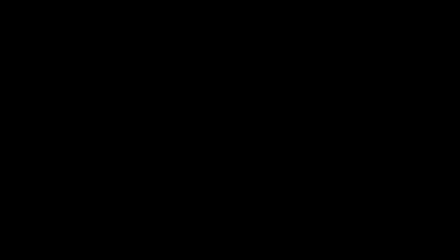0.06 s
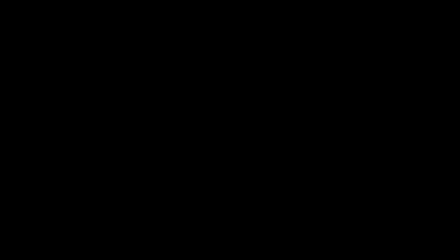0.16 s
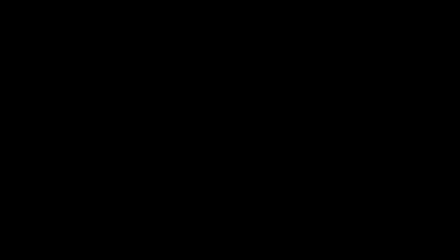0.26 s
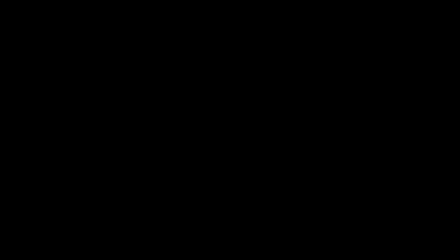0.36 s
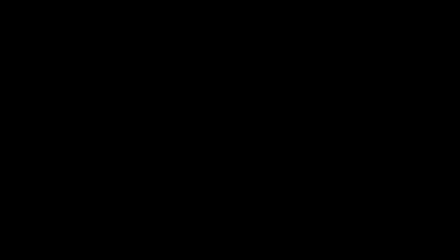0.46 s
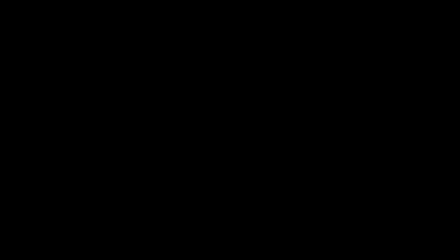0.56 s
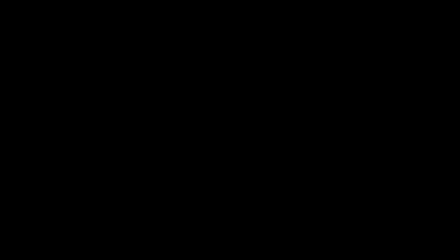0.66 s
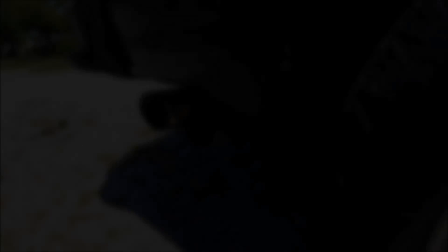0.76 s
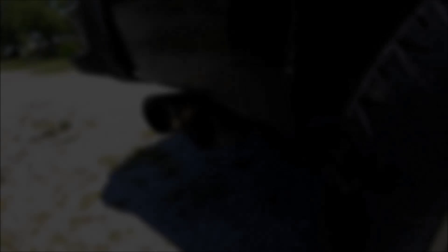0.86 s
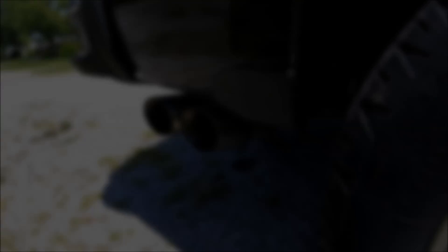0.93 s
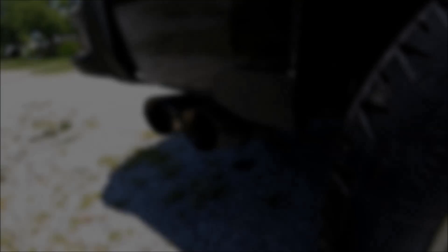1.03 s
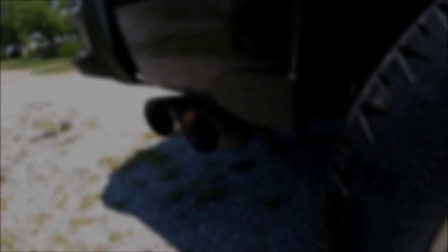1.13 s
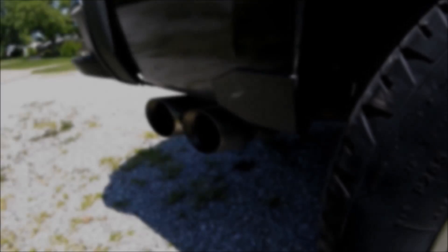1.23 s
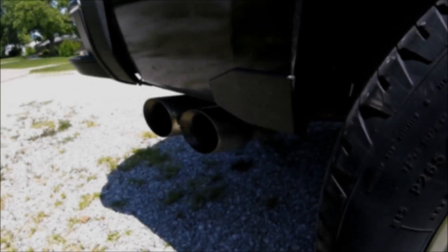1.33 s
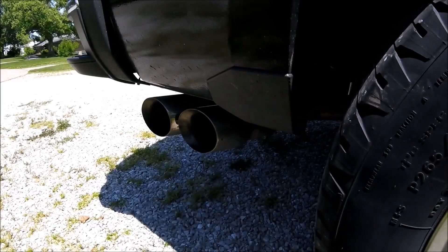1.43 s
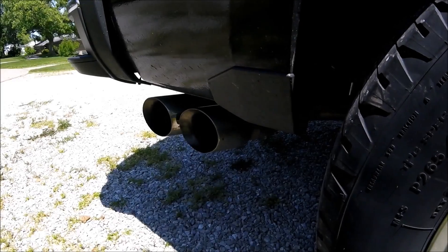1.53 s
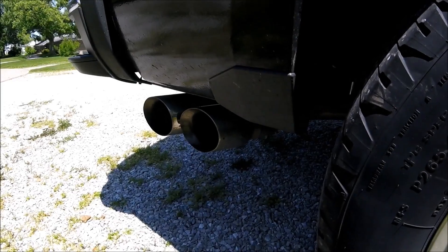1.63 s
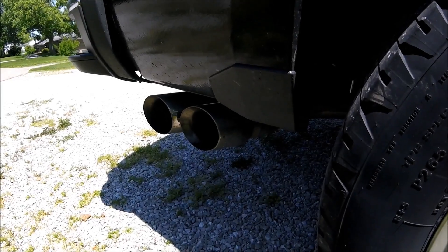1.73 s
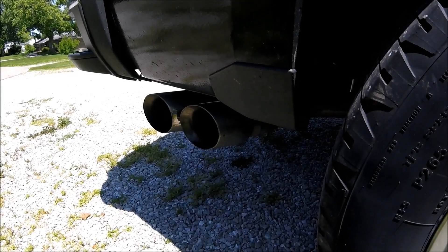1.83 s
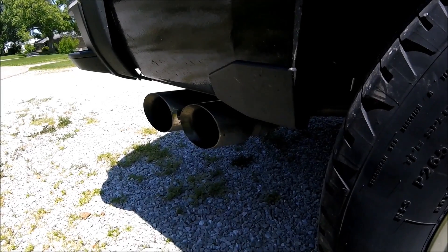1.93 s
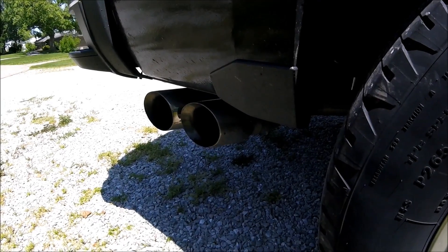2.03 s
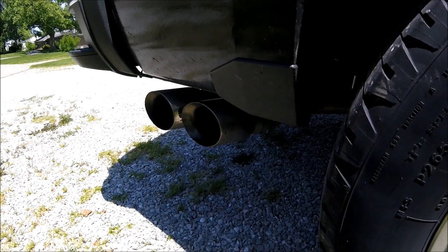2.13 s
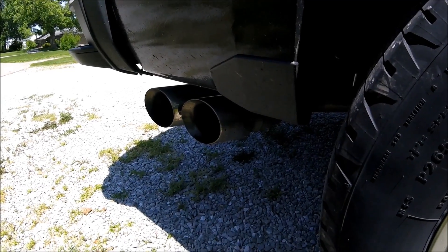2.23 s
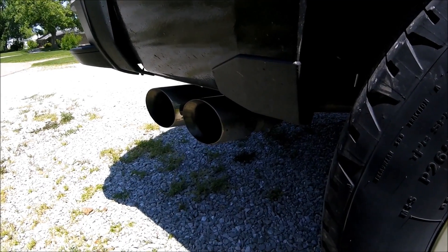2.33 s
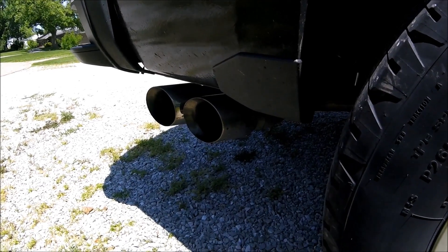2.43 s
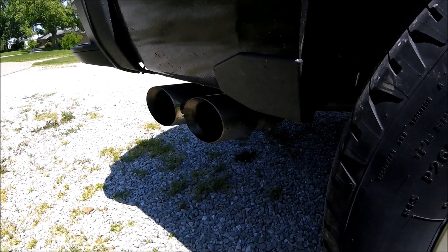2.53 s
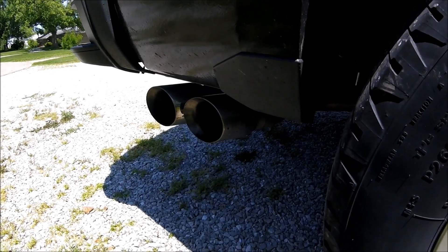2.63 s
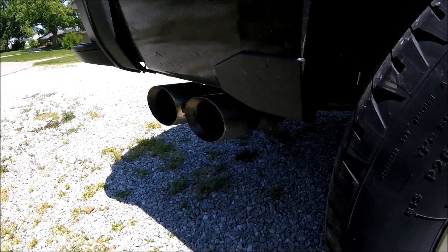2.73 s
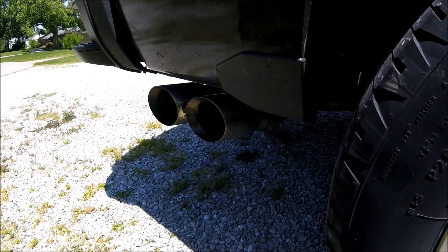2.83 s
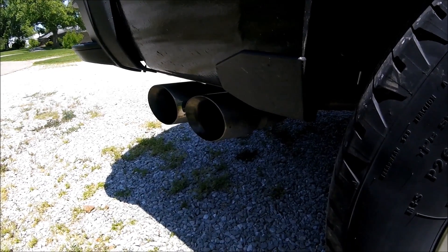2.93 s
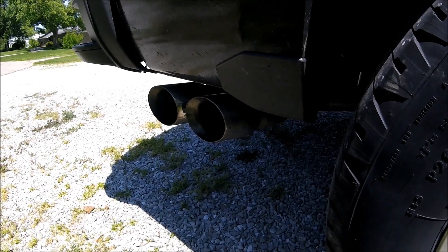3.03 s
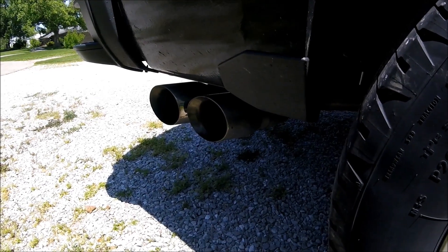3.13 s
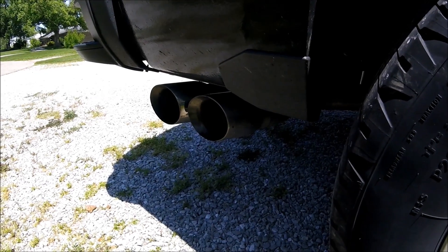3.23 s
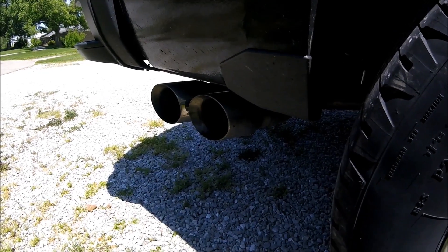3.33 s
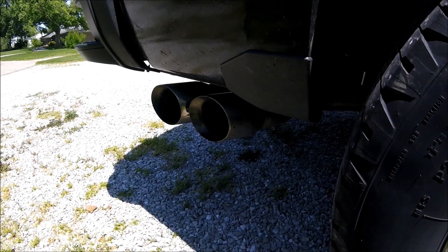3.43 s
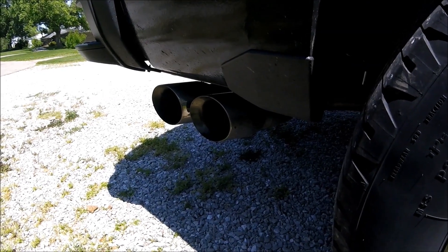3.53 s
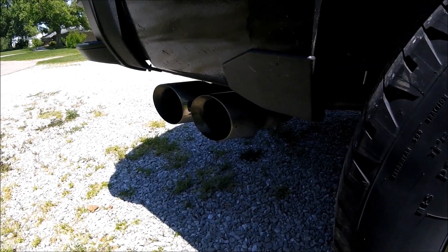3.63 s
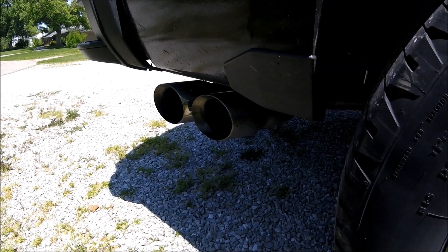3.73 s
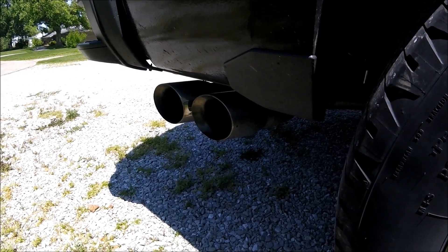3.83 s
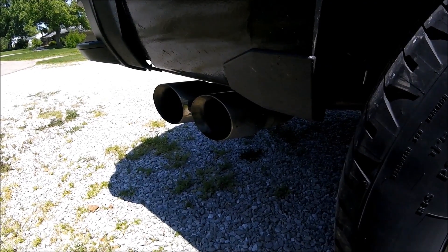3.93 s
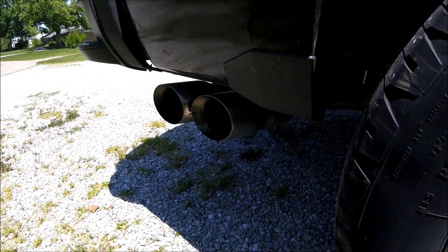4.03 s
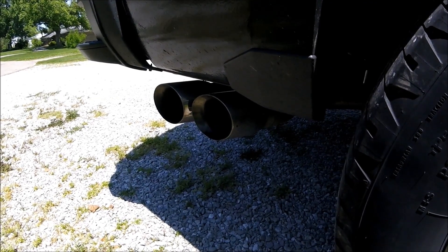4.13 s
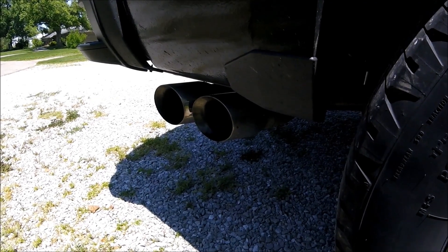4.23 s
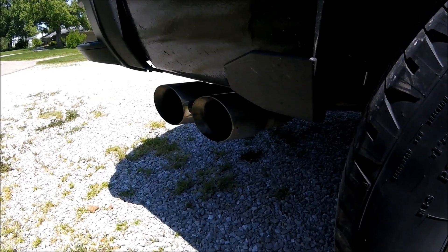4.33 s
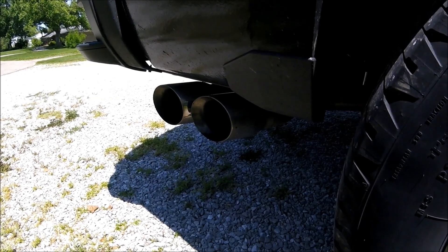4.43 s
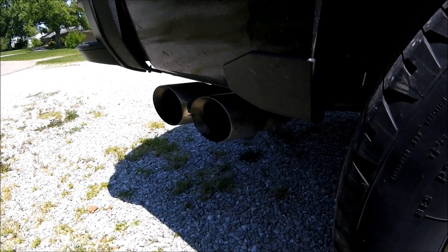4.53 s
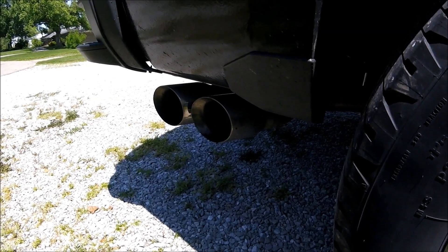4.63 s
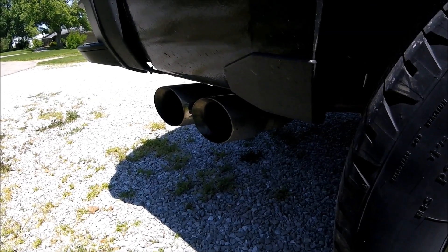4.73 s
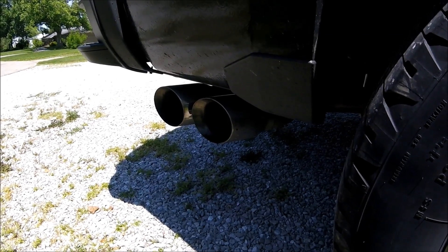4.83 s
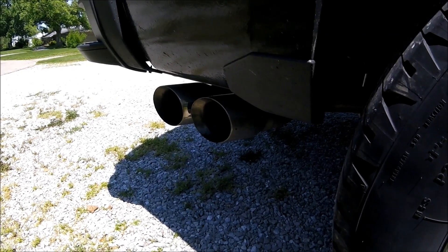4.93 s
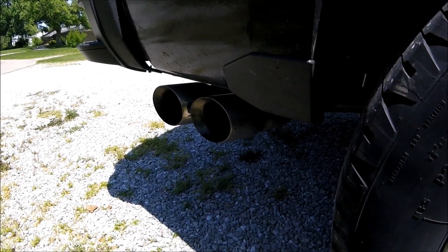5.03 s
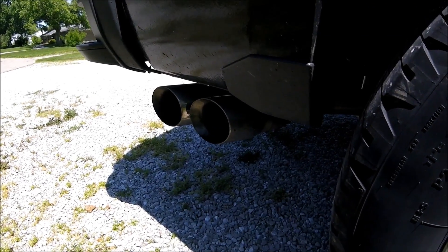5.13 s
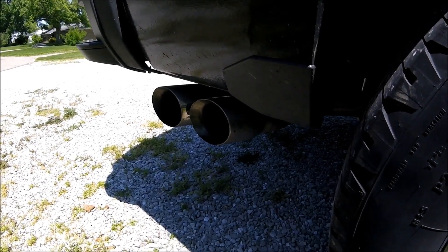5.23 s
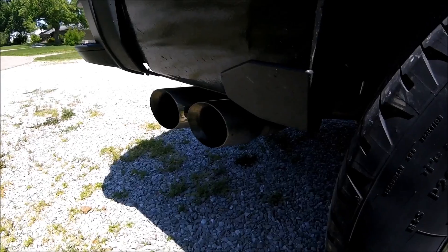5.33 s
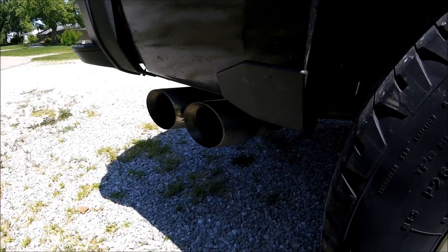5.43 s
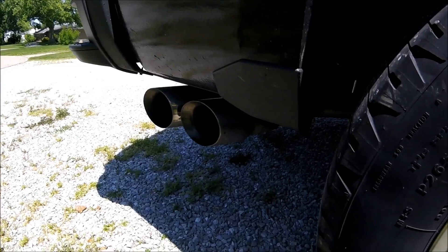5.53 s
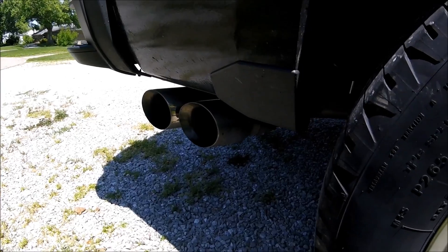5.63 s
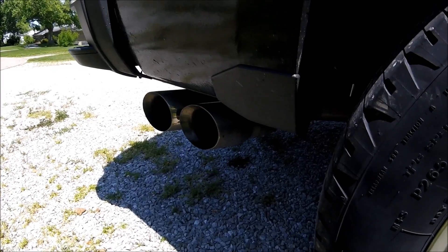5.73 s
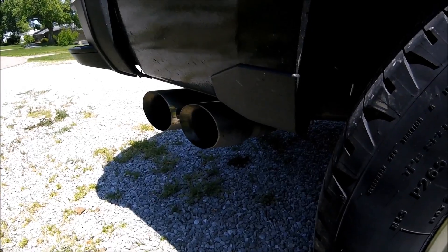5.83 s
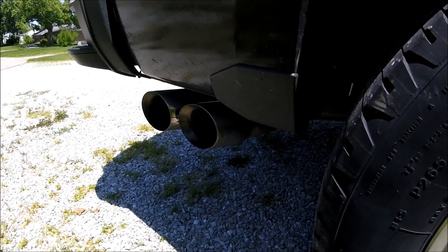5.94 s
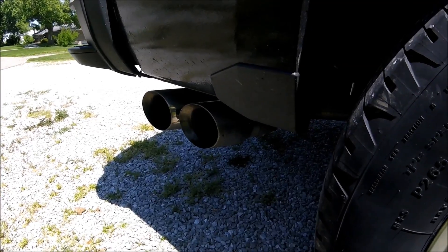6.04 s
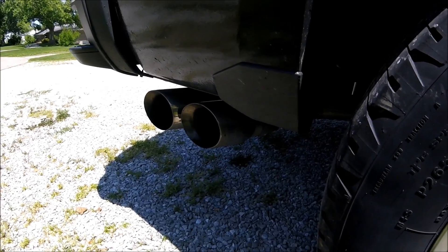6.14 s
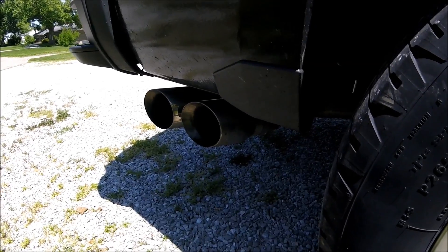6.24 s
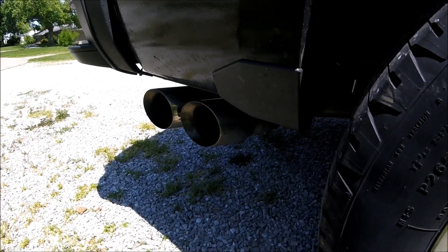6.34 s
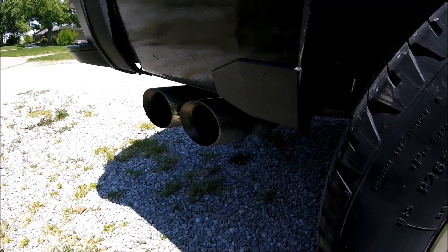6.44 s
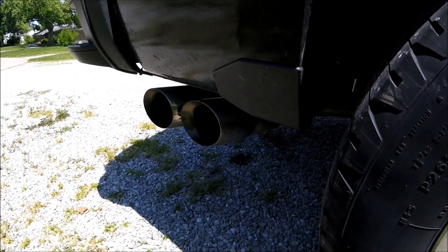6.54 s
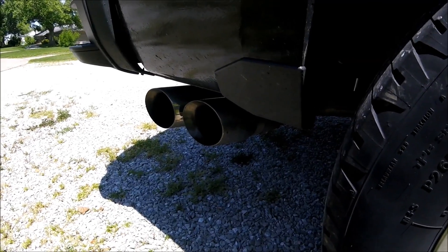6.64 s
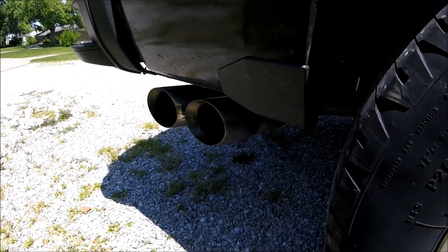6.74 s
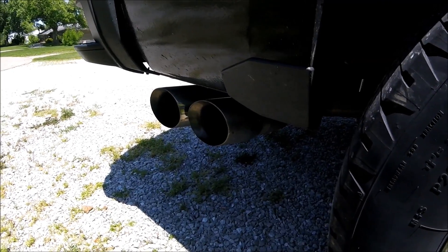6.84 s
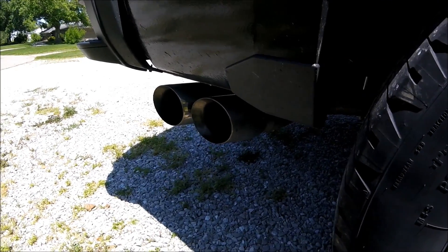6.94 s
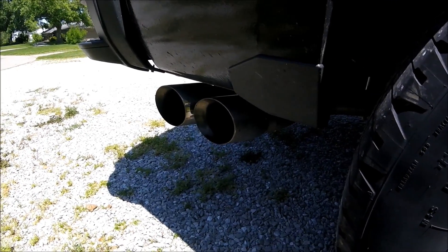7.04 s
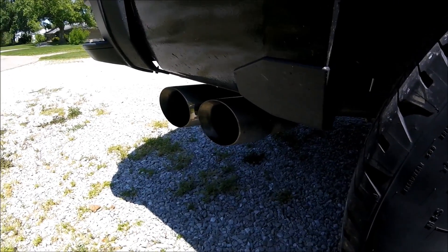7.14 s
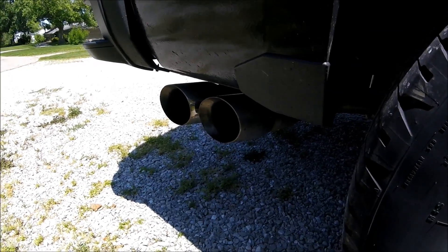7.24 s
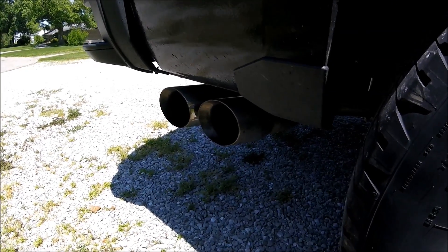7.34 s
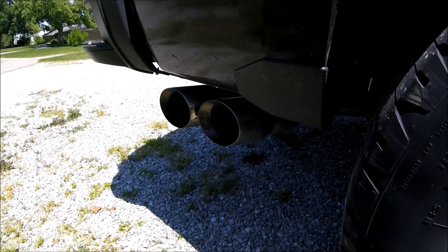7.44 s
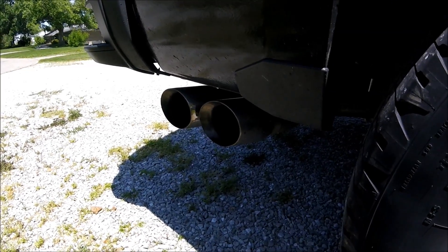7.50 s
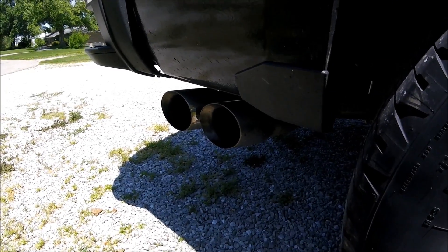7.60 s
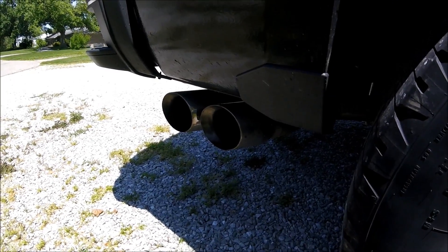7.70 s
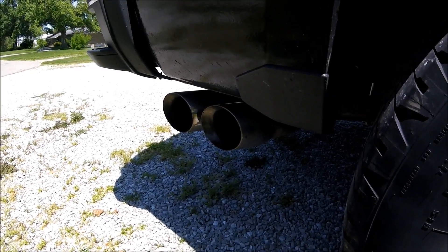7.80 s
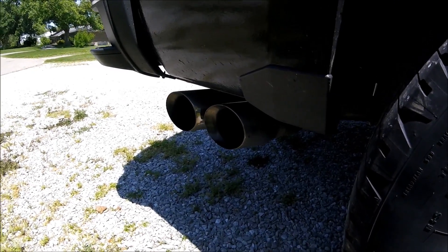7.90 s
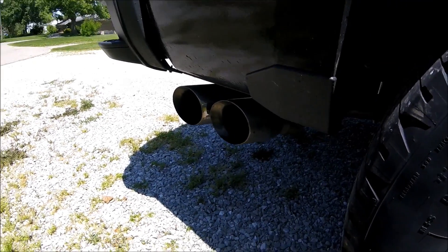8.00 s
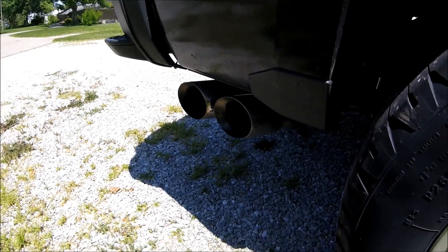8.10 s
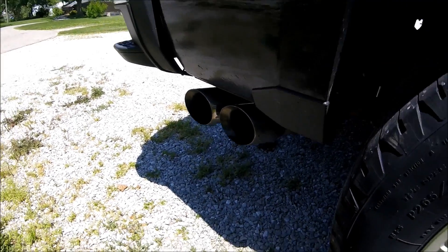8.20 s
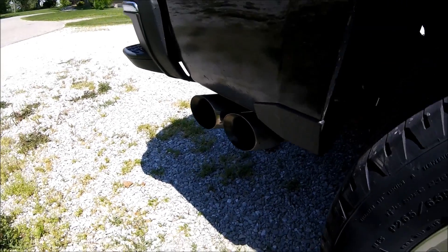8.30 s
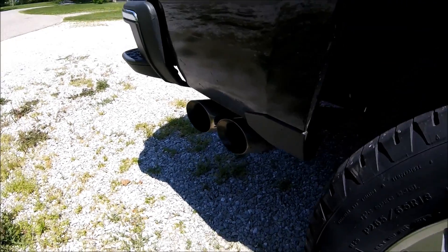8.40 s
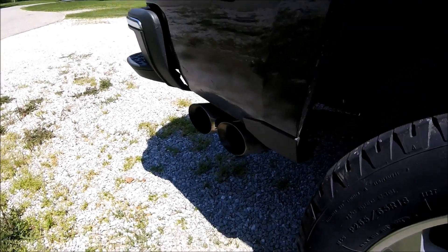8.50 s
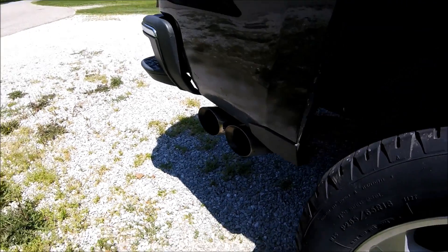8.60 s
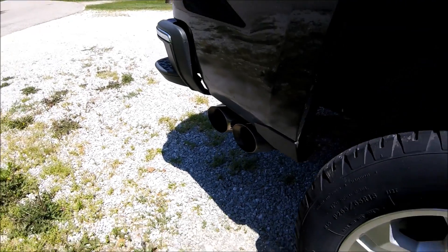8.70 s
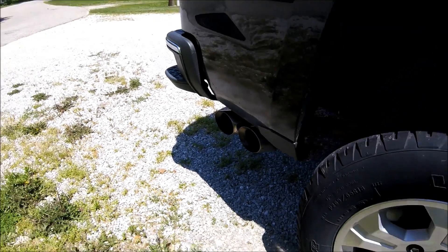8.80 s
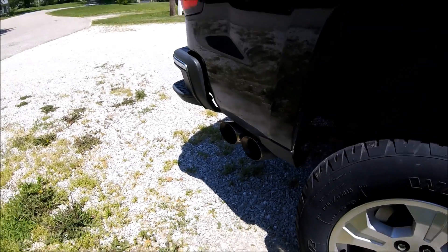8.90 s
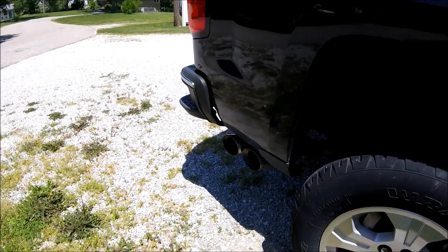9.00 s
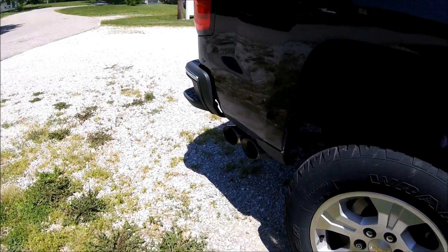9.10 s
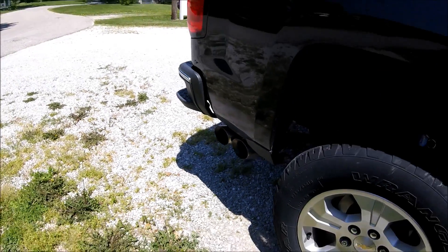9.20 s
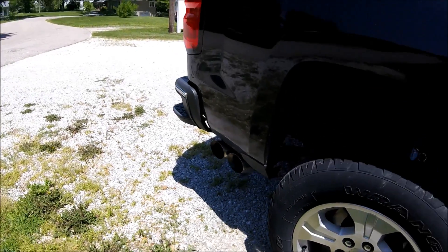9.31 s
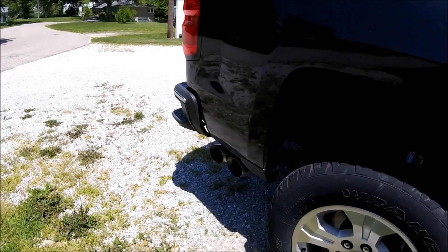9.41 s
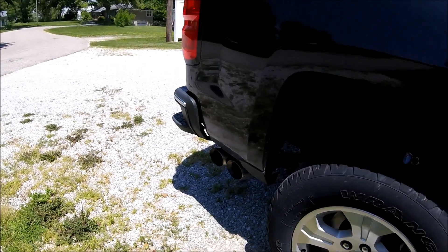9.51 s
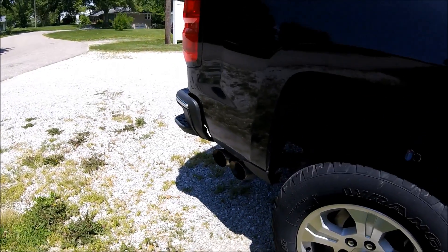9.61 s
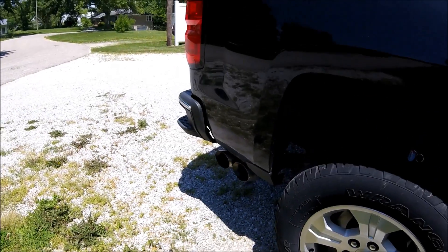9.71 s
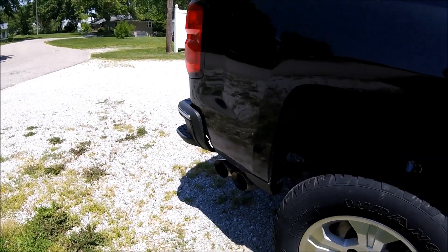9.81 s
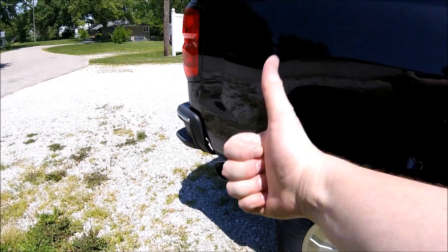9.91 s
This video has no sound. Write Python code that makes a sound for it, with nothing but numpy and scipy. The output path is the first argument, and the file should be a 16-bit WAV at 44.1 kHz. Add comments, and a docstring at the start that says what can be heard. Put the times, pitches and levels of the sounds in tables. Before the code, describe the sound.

The first 1.4 seconds are quiet: faint insects and distant traffic fade in outdoors, with soft bird chirps around 0.4 seconds and clearer sliding notes from 1.0 to 1.3. At 1.44 a starter clashes in, grinding and heaving over compressions with a high wavering whine and ringing metal until about 2.1. Uneven firings thump and crack, and at 2.3 the V8 lights with a loud burst of exhaust and sharp pops, revving up until about 2.6. It eases through 3 to 4 seconds into a deep, booming fast idle, slowing slightly, with throaty growl, hissing gas puffs and a loping pulse. Tiny dry ticks and faint metallic clinks are nearly buried around 6.0 to 6.2, with another tick near 7.2. From about 8.1 the close microphone lifts from the tailpipes; boom and growl thin while the idle continues to the end, near 10.

```python
"""A gravel drive, close to the tailpipes of a V8 truck: insects and far traffic fade in, and birds sing.
The starter clashes in and cranks; a few lone firings catch, the engine flares, then settles to a fast idle.
Near the end the microphone is lifted away from the pipes. Each firing rings pipe resonances and blows a
noisy puff of gas; the starter is coloured noise and unsteady tones; birds are gliding sines with an echo."""
import sys
import numpy as np
from scipy import signal
from scipy.fft import rfft, irfft, next_fast_len
from scipy.io import wavfile
from scipy.ndimage import uniform_filter1d

SR = 44100
rng = np.random.default_rng(int(sys.argv[2]) if len(sys.argv) > 2 else 0)


def waveform_to_disk(signal):
    """Save audio, clipped to [-1, 1], as 16-bit WAV at the path in sys.argv[1]."""
    frames = np.transpose(np.atleast_2d(signal))
    scaled = np.clip(frames, -1, 1) * 32767
    samples = np.round(scaled).astype(np.int16)
    wavfile.write(sys.argv[1], SR, samples)


N = 439236  # length in samples
TIME = np.arange(N) / SR  # seconds


def amp(db):
    """Gain of a level in dB."""
    return 10 ** (np.asarray(db) / 20)


def ramp(x, start, end):
    """0 up to start, 1 from end on, a straight line between."""
    return np.clip((x - start) / (end - start), 0, 1)


def steady(x, seconds):
    """x with its rms over a sliding span brought to about 1."""
    size = int(seconds * SR)
    power = uniform_filter1d(uniform_filter1d(x * x, size=size), size=size)
    return x / np.sqrt(np.abs(power) + 1e-12)


def curves(rows, outside=None):
    """One value per sample for each column after the time, joined by straight lines."""
    s, *columns = np.transpose(rows)
    return [np.interp(TIME, s, column, outside, outside) for column in columns]


def filtered(x, response):
    """x with its spectrum multiplied by a response, a function of frequency in Hz."""
    size = next_fast_len(N + SR // 2)
    return irfft(rfft(x, size) * response(np.fft.rfftfreq(size, 1 / SR)), size)[:N]


def colour(points):
    """Gain drawn through (Hz, dB) points on a log frequency axis, nearly silent beyond the ends."""
    f, db = np.transpose(points)
    return lambda hz: amp(np.interp(np.log(hz + 1), np.log(f), db, -120, -120))


def noise(points):
    """Coloured noise of rms 1."""
    x = filtered(rng.standard_normal(N), colour(points))
    return x / x.std()


def pulses(times, sizes):
    """Single-sample pushes."""
    at = np.clip(np.round(times * SR).astype(int), 0, N - 1)
    return np.bincount(at, sizes, N)


def puffs(pushes, rise_ms, fall_ms):
    """Envelope that swells and dies after every push."""
    t_ms = np.arange(SR // 10) * 1000 / SR
    shape = (1 - np.exp(-t_ms / rise_ms)) * np.exp(-t_ms / fall_ms)
    return signal.fftconvolve(pushes, shape / shape.max())[:N]


def whistle(rows, wander):
    """A sine that follows (s, Hz, rms dB) rows; its phase drifts by about wander radians."""
    hz = curves(rows)[0]
    level = amp(curves(rows, outside=-200)[1])
    drift = wander * steady(uniform_filter1d(rng.standard_normal(N), size=200), 0.78)
    sine = np.sin(2 * np.pi * np.cumsum(hz) / SR + drift)
    return np.sqrt(2) * uniform_filter1d(level, size=150) * sine


# Tone colour of the far traffic and insects. Each row: frequency in Hz, relative level in dB per Hz.
AIR = [(12, -26.5), (20, -2.5), (92, -6), (281, -23.5), (655, -27.5), (2000, -37), (2630, -34.5),
       (3750, -44), (5800, -46), (6650, -33), (13500, -58.5)]
AIR_DB, FADE_S = -50.5, 1.5  # level before the engine catches; seconds to fade in
AIR_LIT_DB = -9  # traffic and insects sound this much quieter once the engine has lit


def far_air():
    """Far traffic and insects as one coloured noise."""
    lit = ramp(TIME, CATCH[0][0], SPEED[1][0])
    return amp(AIR_DB + AIR_LIT_DB * lit) * ramp(TIME, 0, FADE_S) * noise(AIR)


# Bird notes. Each row: start in seconds, length in seconds, from Hz, to Hz, level in dB after the slur.
BIRDS = [(0.38, 0.08, 2900, 3010, -79), (0.475, 0.13, 2200, 2320, -78), (0.55, 0.027, 2800, 3200, -69.5),
         (0.567, 0.11, 3150, 2580, -74.5), (1.003, 0.027, 2290, 2240, -71), (1.024, 0.052, 2280, 2620, -59),
         (1.082, 0.026, 2580, 2180, -63), (1.112, 0.05, 2500, 2560, -67), (1.152, 0.035, 2540, 2160, -62),
         (1.209, 0.044, 2590, 2560, -62.5), (1.258, 0.073, 2610, 3000, -61)]
SLUR_S = 0.016  # longest glide between the two pitches, in seconds
START_DB, END_DB = 1, 2  # each note's start and end, relative to its level after the slur


def birds():
    """Each note slurs quickly to its second pitch; decaying noise makes a short echo."""
    song = 0
    for s, length, from_hz, to_hz, db in BIRDS:
        slurred_s = s + min(SLUR_S, length / 2)
        note = [(s, from_hz, db + START_DB), (slurred_s, to_hz, db), (s + length, to_hz, db + END_DB)]
        song = song + whistle(note, wander=0.69)
    tail_s = np.arange(SR // 4) / SR
    tail = rng.standard_normal(len(tail_s)) * amp(-60 * tail_s / 0.35)  # falls 60 dB per 0.35 s
    return song + amp(-6) * signal.fftconvolve(song, tail / np.linalg.norm(tail))[:N]


# Small dry ticks. Each row: time in seconds, peak level in dB.
TICKS = [(6.026, -54), (6.087, -50), (7.1735, -45)]


def dry_ticks():
    """Very short puffs of bright noise."""
    s, db = np.transpose(TICKS)
    bright = noise([(3500, -2), (7000, 7), (11000, -21.0)])
    return puffs(pulses(s, amp(db)), rise_ms=0.22, fall_ms=8.0) * bright


# A small metal thing clinks. Each row: time in seconds, starting level in dB.
CLINKS = [(6.0, -62), (6.18, -64)]
CLINK_HZ, CLINK_T60_S = 9640, 0.3  # pitch; seconds to fall by 60 dB


def metal_clinks():
    """A high sine that dies away at an even rate in dB."""
    return sum(whistle([(s, CLINK_HZ, db), (s + CLINK_T60_S, CLINK_HZ, db - 60)], wander=.3)
               for s, db in CLINKS)


def outdoors():
    """All the surroundings together."""
    return far_air() + birds() + dry_ticks() + metal_clinks()


# The starter clashes in, then heaves over each compression.
# Each row: time in seconds, added rumble in dB, grind in dB.
HEAVES = [(1.436, -66, -37), (1.46, -31.5, -34), (1.69, -62, -41), (1.834, -36, -39), (1.962, -36.5, -33.5),
          (2.071, -45, -39.5)]
# Tone colours of the body rumble, the gear grind and the gear noise between heaves.
# Each row: frequency in Hz, relative level in dB per Hz.
RUMBLE = [(12, -27), (20, 4.5), (43, -7), (92, -6.5), (124, 3.5), (162, -13), (260, -16.5), (340, -49)]
GRIND = [(150, -36), (285, 6), (363, -2.5), (580, 5.5), (682, -8), (1510, -8), (1890, -5.5), (2980, -19),
         (6380, -12), (7380, -23), (12000, -45), (14000, -70)]
MESH = [(110, -4), (200, -4.5), (900, -3), (2500, -12.5), (3800, -23), (4600, -17.5), (6500, -14.5),
        (9000, -33)]
ENGAGE_S, RELEASE_S = 1.44, 2.115
CRANK_RUMBLE_DB, CRANK_GRIND_DB = -46.5, -44.5  # levels between heaves


def cranking():
    """Rumble and grind noise swell at each heave, over a constant gear noise."""
    s, rumble_db, grind_db = np.transpose(HEAVES)
    rumble = amp(CRANK_RUMBLE_DB) + puffs(pulses(s, amp(rumble_db)), rise_ms=14, fall_ms=78)
    grind = puffs(pulses(s, amp(grind_db)), rise_ms=2.2, fall_ms=30.0)
    engaged = ramp(TIME, ENGAGE_S - 0.012, ENGAGE_S) * ramp(TIME, RELEASE_S, RELEASE_S - 0.0075)
    return engaged * (rumble * noise(RUMBLE) + grind * noise(GRIND) + amp(CRANK_GRIND_DB) * noise(MESH))


# The whine droops under load. Each row: start in seconds, end in seconds, from Hz, to Hz, level in dB.
DROOPS = [(1.83, 1.885, 6300, 5600, -54), (1.965, 2.04, 6500, 5750, -55)]
WHINE_S, WHINE_HZ, WHINE_DB = (1.515, 1.75), (4200, 5430), -57.5  # start and end; lowest and highest pitch


def pinion_whine():
    """The pinion teeth sing as they speed up and slow down again, then droop under load."""
    turn = np.linspace(0, 1, num=21)
    s = np.interp(turn, (0, 1), WHINE_S)
    hz = np.interp(np.sin(np.pi * turn) ** 2, (0, 1), WHINE_HZ)
    arch = np.transpose([s, hz, WHINE_DB + 0 * turn])
    droops = sum(whistle([(start, from_hz, db), (end, to_hz, db)], wander=.9)
                 for start, end, from_hz, to_hz, db in DROOPS)
    return whistle(arch, wander=1) + droops


# Ringing tones of the starter housing.
# Each row: start in seconds, peak in seconds, end in seconds, frequency in Hz, peak level in dB.
HOUSING_RINGS = [(1.59, 1.71, 1.77, 1855, -48), (1.96, 2.01, 2.09, 1855, -48), (1.69, 1.72, 1.79, 860, -45),
                 (1.835, 1.85, 1.9, 1200, -46), (1.97, 2.01, 2.04, 1200, -46), (1.83, 1.86, 1.91, 550, -42),
                 (1.68, 1.71, 1.75, 460, -46), (1.62, 1.65, 1.68, 1000, -49)]


def housing_rings():
    """Each tone swells to its peak and fades a little before it stops."""
    return sum(whistle([(start, hz, db - 7.5), (peak, hz, db), (end, hz, db - 7)], wander=.6)
               for start, peak, end, hz, db in HOUSING_RINGS)


def starter():
    """The clash and cranking, the pinion whine and the ringing housing."""
    return cranking() + pinion_whine() + housing_rings()


# Pipe and muffler resonances: boom, bark, growl, rasp, then SING near 280 Hz and SNAP, the firing's clean edge.
# Each row: frequency in Hz, width in Hz, relative level in dB.
BOOM = [(55.1, 14.0, -4.1), (79.1, 33.8, 0.0), (113.4, 14.0, -4.2)]
BARK = [(159.2, 17.1, 0.0), (197.1, 19.3, -2.1)]
GROWL = [(348.9, 14.8, -18.0), (389.0, 59.5, -6.6), (419.0, 16.0, 0.0), (472.9, 14.0, -3.6)]
RASP = [(494.4, 44.3, 0.0), (574.2, 14.8, -5.8), (604.4, 25.3, -9.8), (651.3, 60.0, -15.9)]
SING = [(278, 50, 0)]
SNAP = [(827, 40, 0), (1080, 150, -8), (1800, 110, -12), (2400, 120, -8)]
# The band of the gas pulse for each of the six sets above, in that order.
# Each row: low edge in Hz, high edge in Hz, steepness of the edges, muffler delay in ms.
PULSE_BANDS = [(15, 140, 10, 1), (130, 250, 10, 1.7), (300, 490, 30, 0), (490, 740, 30, 0),
               (235, 325, 30, 0), (740, 2700, 30, 2)]
PIPE_MODES = {"boom": BOOM, "bark": BARK, "growl": GROWL, "rasp": RASP, "sing": SING, "snap": SNAP}


def pipe(name):
    """Resonances whose signs alternate, fed by a soft gas pulse that spans only their band."""
    low_hz, high_hz, steep, delay_ms = PULSE_BANDS[list(PIPE_MODES).index(name)]

    def response(f):
        delay = np.exp(-2j * np.pi * f * delay_ms / 1000)
        band = delay / (1 + (f / high_hz) ** steep) / (1 + (low_hz / (f + 1)) ** steep)
        ringing = 0
        for k, (centre, width, db) in enumerate(PIPE_MODES[name]):
            ring = 1j * f * width
            ringing = ringing + (-1) ** k * amp(db) * ring / (centre * centre - f * f + ring)
        return band * ringing
    return response


# First uneven firings.
# Each row: time in seconds, relative crack in dB, thump in dB above the crack, rasp in dB above the crack.
CATCH = [(2.104, -17, 2, -4), (2.132, -15, 4, 5.5), (2.147, -47.5, 29, 14), (2.18, -14, -6, 6.5),
         (2.214, -12, -2, 7.5), (2.24, -12.5, -2, 8), (2.276, -27, 10, 6)]
# Sharp pops while the engine flares.
# Each row: time in seconds, relative crack in dB, ring in dB above the crack.
POPS = [(2.296, -13.5, -1), (2.309, -3.5, -5), (2.33, -21.5, -3), (2.362, -5, 0), (2.381, -11, 9.5),
        (2.411, -16.5, -4.5), (2.442, -11, 3.5), (2.464, -11, 8.5), (2.545, -13, 11), (2.604, -18, -1.5),
        (2.622, -16.5, 16), (2.704, -23.5, 16)]
# Tone colour of the cracks. Each row: frequency in Hz, relative level in dB per Hz.
CRACK = [(410, -30), (700, -4), (1250, -2), (1580, -7.5), (1810, -0.5), (2370, -3), (2720, -18),
         (5160, -26), (9000, -49), (12000, -92)]


def outlet(f):
    """Short, broad ring of the pipe end."""
    ring = 1j * f * 260
    return (ring / (460 ** 2 - f * f + ring)) ** 2


def catching():
    """Lone firings thump the pipe; each one and each later pop cracks at the outlet."""
    s, crack_db, thump_db, rasp_db = np.transpose(CATCH)
    low = pulses(s + 0.0017, amp(crack_db + thump_db))
    thump = amp(57.0) * filtered(low, pipe("boom")) + amp(50.0) * filtered(low, pipe("bark"))
    thump = thump + amp(36.0) * filtered(low, pipe("sing"))
    mid = pulses(s + 0.0015, amp(crack_db + rasp_db))
    rasp = amp(37.0) * filtered(mid, pipe("growl")) + amp(32.5) * filtered(mid, pipe("rasp"))
    pop_s, pop_db, ring_db = np.transpose(POPS)
    pop_ring = amp(31.5) * filtered(pulses(pop_s, amp(pop_db + ring_db)), outlet)
    bursts = puffs(pulses(s, amp(crack_db)), rise_ms=0.59, fall_ms=8.3)
    bursts = bursts + puffs(pulses(pop_s, amp(pop_db)), rise_ms=0.85, fall_ms=2.8)
    cracks = amp(3.5) * filtered(bursts * rng.standard_normal(N), colour(CRACK))
    return thump + rasp + pop_ring + cracks


# Crankshaft speed. Each row: time in seconds, turns per minute.
SPEED = [(2.3, 1389.1), (2.42, 1462.6), (2.55, 1506.8), (2.7, 1500.2), (2.9, 1437.3), (3.3, 1335.0),
         (3.5, 1313.3), (3.8, 1299.7), (4.2, 1279.6), (4.7, 1258.5), (5.2, 1251.9), (5.8, 1240.5),
         (6.4, 1239.2), (7.0, 1226.4), (7.5, 1210.2), (8.0, 1206.2), (9.0, 1199.4), (9.96, 1201.6)]
# Gas flow: it sags as the flare dies, then recovers. Each row: time in seconds, flow in dB.
FLOW = [(2.3, -1), (2.6, -2.5), (3.0, -4), (3.3, -4), (3.8, -3), (4.3, -1.9), (5.5, -0.94), (8, -0.08),
        (9.96, 1)]
# The microphone is raised. Each row: time in seconds, height from 0 (low) to 1 (raised).
LIFT = [(8.1, 0.05), (8.6, 0.3), (9.2, 0.91), (9.5, 0.96), (9.96, 0.9)]
# Levels of boom, bark, growl, rasp and hiss, one row each; the jet of the hiss is boosted later.
# Each row: dB at idle, dB per 100 rpm over idle, dB per dB of flow, dB added at light-off, dB added once raised.
LAYERS = [(-14.5, 1.7, 1.65, -4.5, -7.5), (-19, -2.5, 1.4, -0.5, 0), (-21.5, 0.5, 1.43, -9, -13.5),
          (-24.5, 1.33, 1.77, -18, -5.5), (-40.5, 0.5, 1.28, 1.5, -4.5)]
IDLE_RPM, LIGHT_OFF_S = 1200, 0.23  # the first rush of gas dies away with this time constant
ROUGH_IDLE, ROUGH_FAST, ROUGH_RAISED = 0.07, 0.13, 0.05  # turbulent share at idle, at speed, added once raised
SMOOTH_RPM, ROUGH_RPM = 1255, 1400  # the turbulent share climbs between these
# Cylinders boom nearly alike above the first speed and lope (differ) fully below the second.
EVEN_RPM, LOPING_RPM, LEAST_LOPE = 1474, 1237, 0.07


def controls():
    """Layer levels in dB, turbulent share, lope and lift, from speed, flow and microphone height."""
    rpm, flow_db, lift = curves(SPEED)[0], curves(FLOW)[0], np.clip(curves(LIFT)[0], 0, 1)
    rush = np.exp(-np.clip(TIME - SPEED[0][0], 0, None) / LIGHT_OFF_S)
    over_idle = (rpm - IDLE_RPM) / 100
    levels_db = [idle + per_rpm * over_idle + per_flow * flow_db + first * rush + raised * lift
                 for idle, per_rpm, per_flow, first, raised in LAYERS]
    turbulent = ROUGH_IDLE + (ROUGH_FAST - ROUGH_IDLE) * ramp(rpm, SMOOTH_RPM, ROUGH_RPM)
    turbulent = np.clip(turbulent + ROUGH_RAISED * lift, 0, 1)
    lope = np.maximum(ramp(rpm, EVEN_RPM, LOPING_RPM), LEAST_LOPE) * (1 - rush)
    return levels_db, turbulent, np.clip(lope, 0, 1), lift


# Colour of the gas jet at the pipe mouth, microphone low and raised.
# Each row: frequency in Hz, relative level in dB per Hz.
JET_LOW = [(380, -20.5), (650, -10.5), (827, -6.5), (1180, -10.5), (1500, -13.5), (1680, -10.5),
           (2370, -15.5), (2660, -24.5), (3990, -27.5), (4480, -51), (4800, -32.5), (5700, -39.5),
           (9830, -72), (13500, -83.5)]
JET_HIGH = [(380, -3), (650, -5.5), (870, -7.5), (1050, -7.5), (1500, -15), (1750, -16), (2430, -13),
            (2730, -18), (3340, -26), (4480, -34), (5020, -32), (6300, -32.5), (7340, -44.5), (13500, -73)]
JET_MIX = 0.39  # share of the raised jet colour already heard low down
TREBLE_HZ, TREBLE_DB_PER_100_RPM = 5870, -2  # the top of the hiss is duller at speed


def gas_jet(low, high, rpm, lift):
    """Hiss of the gas: gusts from each firing over a steady flow, at rms near 1 before the treble dulls."""
    # the steady flow weighs more at both ends of the hiss than around 2 kHz
    flow_colour = colour([(300, -12), (1200, -12), (2200, -17), (5000, -6), (14000, -3)])
    even = filtered(rng.standard_normal(N), flow_colour)
    gusts = filtered(low * rng.standard_normal(N), lambda hz: hz < 1550)
    gusts = gusts + filtered(high * rng.standard_normal(N), lambda hz: hz >= 1550)
    # the ground reflection cuts other notches once the microphone rises
    mix = JET_MIX + (1 - JET_MIX) * lift
    jet = (1 - mix) * filtered(gusts + even, colour(JET_LOW)) + mix * filtered(gusts + even, colour(JET_HIGH))
    jet = steady(jet, 0.25)
    treble = filtered(jet, lambda hz: hz > TREBLE_HZ)
    return jet - treble + amp(TREBLE_DB_PER_100_RPM * (rpm - IDLE_RPM) / 100) * treble


def tone(pushes, name):
    """Firings ring the pipe, held near rms 1."""
    return steady(filtered(pushes, pipe(name)), .2)


def part_rough(pushes, name, gust, turbulent):
    """Pipe resonances rung partly by clean firings and partly by turbulent gas."""
    rough = steady(filtered((0.068 + gust) * rng.standard_normal(N), pipe(name)), 0.022)
    return np.sqrt(1 - turbulent) * tone(pushes, name) + np.sqrt(turbulent) * rough


# Each cylinder's path through the pipes, one row a cylinder in firing order.
# The lope scales boom only, and lifting the microphone widens the bark's level differences.
# Each row: boom lag in ms, boom in relative dB, bark lag in ms, bark in relative dB.
CYLINDERS = [(1.5, -10.5, 0.8, -6.2), (-1.9, -7.3, -3.0, -4.2), (0.3, -2.3, 3.4, -9.2),
             (-1.7, -14.6, 4.1, -10.1), (0.1, -7.6, 2.6, -4.0), (-0.5, 0.0, -1.5, -18.7),
             (-6.0, -4.5, 5.1, -4.7), (-0.2, -4.3, 3.5, 0.0)]
# The higher notes lope differently as the revs fall, and again at idle heard from above (RAISED).
# Each row, one a cylinder: lag in ms and relative level in dB for singing, then growl, rasp and hiss.
FLARING = [(1.0, -4.2, -0.6, -0.5, -0.2, -2.8, -1.2, -1.2), (5.7, -2.2, -2.3, -3.7, -1.9, -8.1, -2.0, -2.4),
           (0.7, -7.1, -6.0, -3.0, 0.9, -2.1, -1.7, -2.1), (-0.7, -5.7, -3.0, 0.0, -1.9, -2.5, -1.9, 0.0),
           (-5.4, 0.0, 0.6, -4.8, 2.3, -0.5, -0.3, -4.0), (-4.0, -8.5, -3.6, -0.5, -4.0, -7.4, -1.1, -4.5),
           (-5.5, -4.9, -0.1, -5.6, -1.0, 0.0, 0.1, -8.9), (2.4, -1.8, -0.9, -10.1, -4.7, -4.6, 4.3, -5.0)]
SETTLING = [(-4.4, -14.0, 1.8, -2.3, 1.9, -3.4, -2.4, -0.8),
            (-2.9, -4.6, -3.8, -7.8, -4.5, -8.9, -0.8, -4.0),
            (2.9, -5.7, 1.7, -9.1, -0.9, -6.1, -1.0, -4.5), (-4.3, -7.2, 3.3, -5.7, 4.3, -4.5, -1.8, 0.0),
            (-2.2, -5.2, 3.5, -0.6, 5.0, -1.0, -0.4, -4.3), (3.7, -2.8, -1.9, 0.0, -0.7, -4.6, -1.4, -2.1),
            (1.2, -2.0, 3.8, -17.9, -4.0, 0.0, 0.5, -6.6), (-5.2, 0.0, -0.4, -1.2, 5.0, -0.5, 1.2, -4.9)]
IDLING = [(-3.3, -5.1, -4.9, -6.8, -1.8, -14.3, -2.0, 0.0),
          (-6.0, -12.1, 0.8, -4.0, -0.5, -10.5, -0.4, -3.3),
          (-2.3, -10.1, 0.0, -2.4, 0.6, -9.1, -0.2, -4.9), (3.7, -11.5, 0.3, -8.0, 1.7, -10.5, -2.0, -6.5),
          (6.0, -6.8, 3.9, 0.0, 1.6, -4.9, 0.1, -4.7), (2.8, -2.4, -4.3, -1.6, 1.0, 0.0, -1.0, -4.3),
          (2.9, 0.0, -2.2, -8.4, -4.3, -6.7, 1.0, -5.1), (-3.7, -0.7, -0.4, -1.6, -4.4, -12.8, 0.3, -4.2)]
RAISED = [(1.7, 0.0, -1.2, -3.8, 4.0, -15.0, -1.0, -1.7), (-5.8, -5.1, -1.6, -4.5, 5.0, -8.7, -0.7, -1.5),
          (5.1, -9.3, 0.1, -2.9, 3.8, -11.2, -0.5, 0.0), (1.0, -8.1, -4.4, -4.4, 1.4, -8.2, -0.8, -4.5),
          (-3.5, -3.1, 4.1, 0.0, -4.4, -12.3, 0.3, -2.0), (-3.7, -14.6, -4.4, -0.9, 0.9, 0.0, 0.2, -2.6),
          (5.1, -6.9, 3.6, -6.0, -4.6, -4.2, 0.8, -3.3), (5.5, -4.4, 5.0, -0.1, 4.6, -5.9, 0.4, -5.7)]
# Speeds in rpm of the idling, settling and flaring lope, in one row.
LOPE_RPM = (1230, 1280, 1420)
# The bark heard from above. Each row: frequency in Hz, relative level in dB.
BARK_RAISED = [(100, -4), (160, -4.5), (190, 3), (330, 2.5)]
# The resonance near 280 Hz sings while the revs settle. Each row: time in seconds, level in dB.
SINGING = [(2.3, -43), (4.4, -32), (6, -39), (8.2, -34), (9.96, -47.5)]
BARK_LOPE = 0.81  # once raised, the level differences between cylinders in the bark grow by this share
SNAP_DB = -1.3  # clean edge of each firing, relative to the hiss layer
JET_DB, UNLIT_DB = 9.5, -0.5  # jet over the hiss layer; added between the first lone firings


def exhaust():
    """Eight firings in two turns; each rings the pipe resonances and blows a turbulent puff."""
    rpm = curves(SPEED)[0]
    levels_db, turbulent, lope, lift = controls()
    boom_db, bark_db, growl_db, rasp_db, hiss_db = levels_db

    firings = np.cumsum(rpm * (TIME >= SPEED[0][0])) / SR * 4 / 60  # four firings a turn
    count = np.arange(int(firings[-1]))
    fired = np.interp(count, firings, TIME)
    fired[0] = SPEED[0][0]
    chance = rng.standard_normal((len(count), 9))
    gust_chance = chance[:, 4:6]
    chance[:, 4:6] = (gust_chance + np.roll(gust_chance, 1, axis=0)) / np.sqrt(2)  # strong gusts come in runs

    # at high revs the cylinders boom more alike
    paths = np.array(CYLINDERS)[count % 8]
    paths[:, :2] *= np.interp(fired, TIME, lope)[:, None]
    up = np.interp(fired, TIME, lift)
    paths[:, 3] *= 1 + BARK_LOPE * up
    # one lope fades into the next with speed and microphone height
    fired_rpm = np.interp(fired, TIME, rpm)
    shares = [np.interp(fired_rpm, LOPE_RPM, row) * (1 - up) for row in np.eye(3)] + [up]
    lopes = np.array([IDLING, SETTLING, FLARING, RAISED])[:, count % 8]

    def one(rows, column_pair, scatter_db, jitter_ms, draw, share=1):
        """Pushes with each cylinder's lag and level, scattered by chance."""
        lag_ms = rows[:, 2 * column_pair] + jitter_ms * chance[:, 8]
        level_db = rows[:, 2 * column_pair + 1] + scatter_db * chance[:, draw]
        return pulses(fired + lag_ms / 1000, share * amp(level_db))

    def train(column_pair, scatter_db, jitter_ms, draw):
        """Pushes of all four lopes, each by its share."""
        return sum(one(rows, column_pair, scatter_db, jitter_ms, draw, share)
                   for rows, share in zip(lopes, shares))

    # the gas leaves in one gust per firing; low and high eddies vary on their own
    low = puffs(train(3, scatter_db=2.2, jitter_ms=.4, draw=4), rise_ms=2.2, fall_ms=3.5)
    high = puffs(train(3, scatter_db=2.2, jitter_ms=.4, draw=5), rise_ms=3, fall_ms=3)
    boom = tone(one(paths, 0, scatter_db=1, jitter_ms=.04, draw=0), "boom")
    bark = tone(one(paths, 1, scatter_db=.85, jitter_ms=.04, draw=1), "bark")
    bark = (1 - lift) * bark + lift * steady(filtered(bark, colour(BARK_RAISED)), 0.17)
    growl = part_rough(train(1, scatter_db=.9, jitter_ms=.04, draw=2), "growl", low, turbulent)
    rasp = part_rough(train(2, scatter_db=1.1, jitter_ms=.04, draw=3), "rasp", low, turbulent)
    sung = amp(curves(SINGING)[0]) * tone(train(0, scatter_db=.8, jitter_ms=.04, draw=6), "sing")
    snap = amp(SNAP_DB) * tone(train(3, scatter_db=2, jitter_ms=.08, draw=7), "snap")
    jet = gas_jet(low, high, rpm, lift)

    notes = amp(boom_db) * boom + amp(bark_db) * bark + amp(growl_db) * growl + amp(rasp_db) * rasp
    running = ramp(TIME, 2.285, 2.298)
    flowing = ramp(TIME, 2.095, 2.108)  # gas already flows with the lone firings
    jet_gain = amp(hiss_db + JET_DB + UNLIT_DB * (1 - running))
    return running * (notes + sung + amp(hiss_db) * snap) + flowing * jet_gain * jet


# Narrow hollows where the ground and bodywork echoes cancel; they slide as the microphone rises.
# Each row: Hz when low, Hz when raised, depth from 0 to 1 when low, depth from 0 to 1 when raised.
HOLLOWS = [(310, 310, .7, .2), (762, 865, .8, .9), (928, 885, .8, .3), (1405, 1310, .75, .6),
           (1575, 1560, .92, .7), (2110, 2120, .65, .75), (2725, 2760, .85, .5)]
HOLLOW_WIDTH = 0.077  # share of the centre frequency


def hollowed(x):
    """x with the echo hollows cut out at the microphone's height."""
    hz, t, spectrum = signal.stft(x, SR, nperseg=2048)
    up = np.clip(np.interp(t, *np.transpose(LIFT)), 0, 1)
    f = hz[:, None]
    gain = 1
    for low_hz, high_hz, low, high in HOLLOWS:
        centre = low_hz + (high_hz - low_hz) * up
        depth = np.clip(low + (high - low) * up, 0, 1)
        ring = 1j * f * HOLLOW_WIDTH * centre
        gain = gain * (1 - depth * ring / (centre * centre - f * f + ring))
    return signal.istft(spectrum * gain, SR, nperseg=2048)[1][:N]


def scene():
    """Everything at one microphone; only the exhaust and its cracks pass through the hollows."""
    return (outdoors() + starter() + hollowed(catching() + exhaust()))[None]


TOP_HZ = 13850


def record(dry):
    """Nothing is kept from TOP_HZ upward."""
    return filtered(dry[0], lambda hz: hz < TOP_HZ)[None]


dry = scene()
out = record(dry)
waveform_to_disk(out)
```